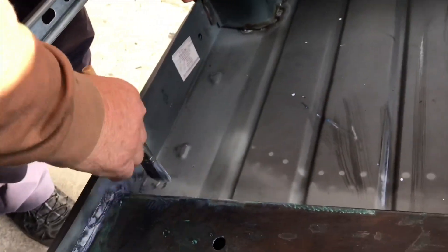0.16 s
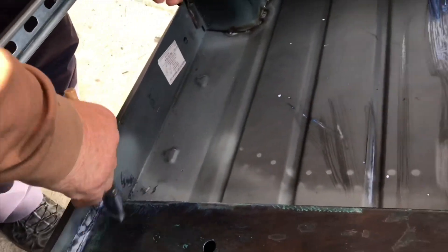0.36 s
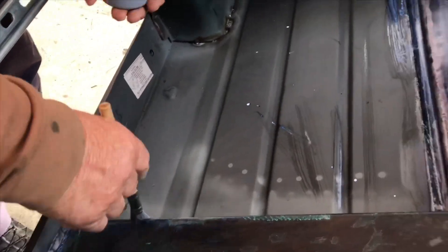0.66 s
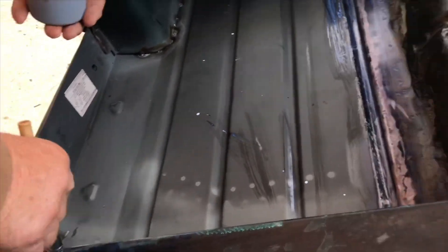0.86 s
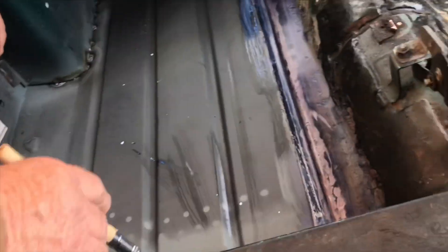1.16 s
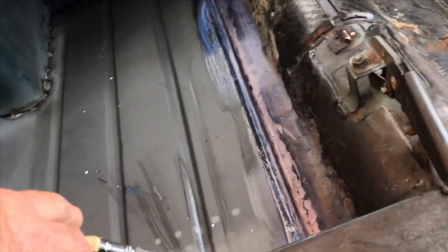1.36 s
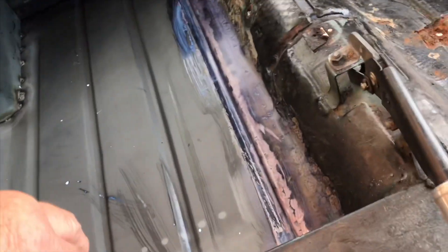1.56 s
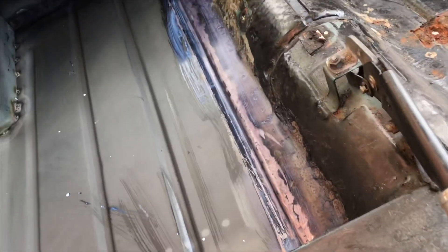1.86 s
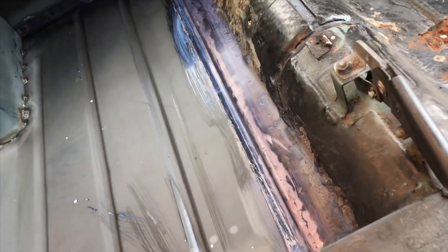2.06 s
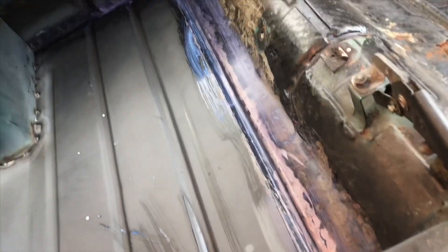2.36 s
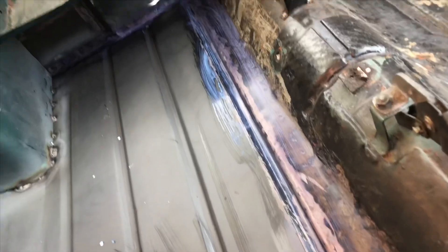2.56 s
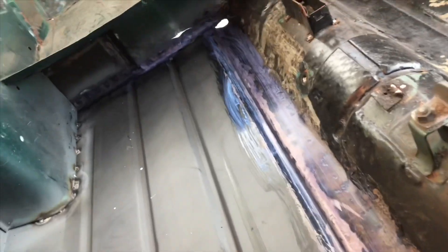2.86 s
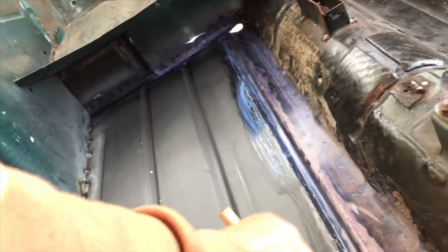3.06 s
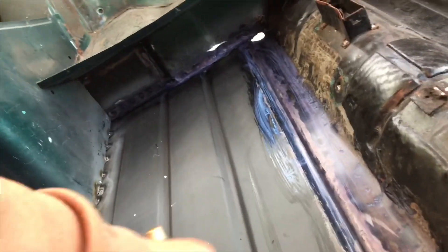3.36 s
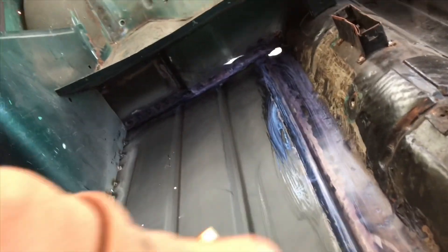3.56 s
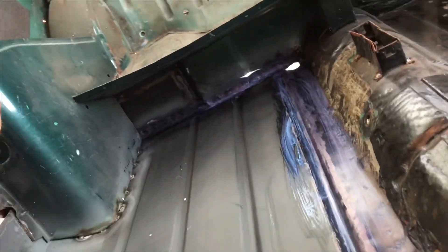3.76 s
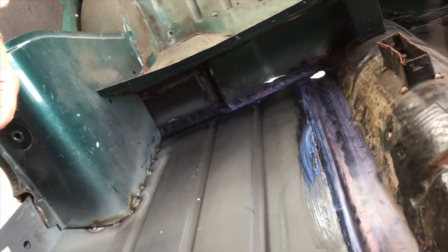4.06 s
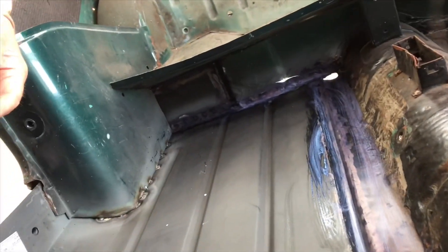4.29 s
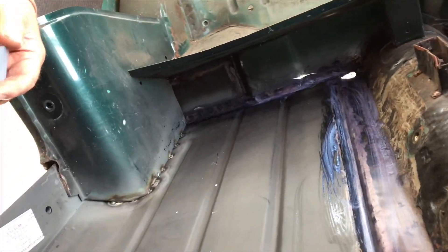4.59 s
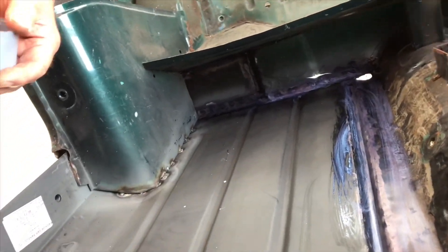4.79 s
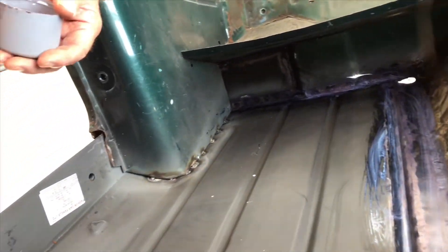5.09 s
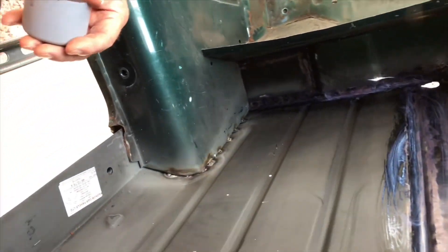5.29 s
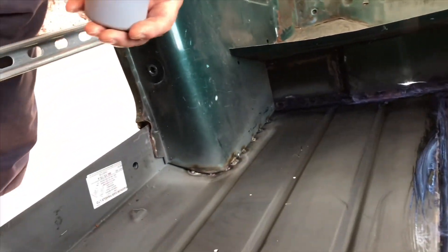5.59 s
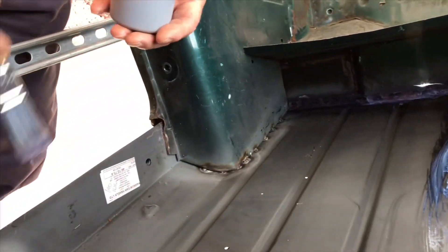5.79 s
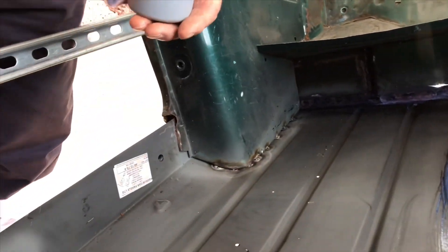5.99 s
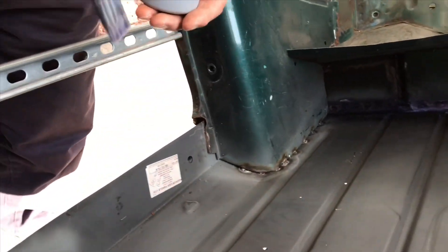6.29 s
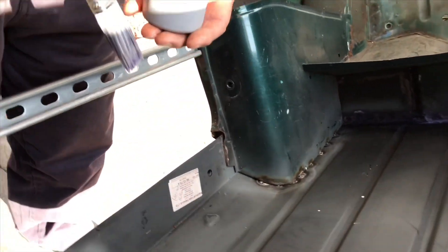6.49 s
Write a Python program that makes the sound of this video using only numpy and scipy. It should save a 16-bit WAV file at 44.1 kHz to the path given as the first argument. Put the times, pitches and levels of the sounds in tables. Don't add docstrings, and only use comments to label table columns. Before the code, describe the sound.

Quick, crisp bristle dabs come first, with a couple of small ticks on metal. Rougher overlapping strokes follow, making thin sheet steel resonate, with brief squeaks and solid knocks. Brisk scrubbing continues, thins out, and ends in a short metallic clank and fade. It is close, dry and mono, with a very short dull tail, faint room noise and hiss, and soft low wind thumps on the microphone.

```python
import sys
import numpy as np
from scipy import signal
from scipy.fft import rfft, irfft, next_fast_len
from scipy.io import wavfile
from scipy.ndimage import uniform_filter1d

SR = 44100
rng = np.random.default_rng(int(sys.argv[2]) if len(sys.argv) > 2 else 0)


def unload_wav(signal):
    wavfile.write(
        sys.argv[1],
        SR,
        np.round(np.clip(np.atleast_2d(signal).T, -1, 1) * 32767).astype(np.int16),
    )


def voltage_ratio(decibels):
    exponent = np.asarray(decibels, float) / 20
    return 10 ** exponent


N = 292806


def evened(x):
    return x / np.sqrt(np.mean(x ** 2) + 1e-20)


def smoothed(x, size, axis=-1):
    return uniform_filter1d(uniform_filter1d(x, size, axis=axis), size, axis=axis)


def curves(rows):
    s, *columns = np.transpose(rows)
    return [np.interp(np.arange(N) / SR, s, column) for column in columns]


def colour(x, spectrum):
    size = next_fast_len(len(x))
    hz, db = np.transpose(spectrum)
    bins_hz = np.fft.rfftfreq(size, 1 / SR)
    gain = voltage_ratio(np.interp(np.log(bins_hz + 0.13), np.log(hz + 0.064), db))
    return evened(irfft(rfft(x, size) * gain, size)[:len(x)])


def dulled(x, hz):
    return signal.sosfilt(signal.butter(N=4, Wn=hz, fs=SR, output="sos"), x)


def resonate(x, hz, width):
    r = np.exp(-np.pi * width / SR)
    return signal.lfilter([1 - r, 0, r - 1], [1, -2 * r * np.cos(2 * np.pi * hz / SR), r * r], x)


def chatter(size, depth_db):
    bumps = evened(smoothed(rng.standard_normal(N), size))
    return evened(voltage_ratio(depth_db * bumps))


# f/Hz, level/dB per Hz
SHOP = [(88, -34), (150, -10), (269, 0), (302, -3.5), (437, -8), (845, -14.5), (1430, -18.5), (1800, -20),
        (4200, -21.5), (6000, -73.5), (15900, -120)]
# f/Hz, level/dB per Hz
SELF_NOISE = [(1200, -31), (3000, 2.5), (4300, -6), (5000, -4), (10000, -12), (15750, -12), (15950, -80)]
# t/s, level/dB
FADE = [
    (0, 0),
    (6.15, -3),
    (6.25, -14.5),
    (6.32, -29.5),
    (6.55, -25.5),
    (6.64, -16),
]


def shop():
    uneven = chatter(size=3000, depth_db=1.5)
    room = voltage_ratio(-64) * colour(rng.standard_normal(N), SHOP) * uneven
    hiss = voltage_ratio(-76) * colour(rng.standard_normal(N), SELF_NOISE)
    fade_db = curves(FADE)[0]
    return voltage_ratio(fade_db) * (room + hiss)


# t/s, slow pressure level/dB, eddies re slow level/dB
BUFFET = [(0.0, -40.5, -3), (0.18, -17, -27), (0.26, -29, -9), (1.13, -22.5, -20.5), (1.35, -32, -6.5),
          (1.55, -19, -21), (2.11, -28.5, -12), (2.16, -18, -23), (4.25, -20.5, -16.5),
          (4.44, -31.5, -11.5), (4.49, -17, -25), (4.94, -28, -11.5), (5.75, -24, -19), (5.9, -39.5, 1),
          (6.1, -20.5, -21), (6.36, -57, -4.5), (6.58, -45, -24), (6.64, -54.5, 2)]
# f/Hz, level/dB per Hz
SWAY = [(1, 7), (4, 10), (9, 12.5), (13, 11), (18, 1.5), (24, -21.5), (40, -68.5), (200, -160)]
# f/Hz, level/dB per Hz
RUMBLE = [(12, -16.5), (22, -1), (30, -2.5), (40, -11.5), (58, -19), (76, -19), (100, -25), (130, -33.5),
          (200, -42.5), (300, -97.5), (900, -150)]


def buffet():
    slow_db, rumble_db = curves(BUFFET)
    sway = colour(rng.standard_normal(N), SWAY)
    rumble = colour(rng.standard_normal(N), RUMBLE)
    power = smoothed(sway ** 2, size=5000)
    even_sway = evened(sway / np.sqrt(power + 0.068))
    return voltage_ratio(slow_db) * (voltage_ratio(-0.7) * even_sway + voltage_ratio(rumble_db + 3) * rumble)


def walls(x):
    t = np.arange(SR // 4) / SR
    tail = rng.standard_normal(len(t)) * voltage_ratio(-60 * t / 0.12) * (t > 0.003)
    tail = tail / np.linalg.norm(tail)
    return dulled(signal.oaconvolve(x, tail)[:N], 4000)


# t/s, peak level/dB, ringing f/Hz, t60/s, crack re ring level/dB
KNOCKS = [(0.019, -47, 897, 0.03, -11), (0.267, -35, 1100, 0.0455, 2.5), (0.522, -49.5, 1100, 0.034, -1),
          (1.48, -61, 607, 0.027, -4.5), (1.534, -59.5, 600, 0.03, -3.5), (3.085, -39, 2570, 0.053, -15.5),
          (3.454, -27, 850, 0.021, -5), (3.618, -37, 1420, 0.037, -4), (3.714, -40, 814, 0.046, -6.5),
          (4.59, -31, 1280, 0.022, -0.5), (5.272, -34, 1280, 0.024, -8.5), (5.637, -49, 1450, 0.044, -22),
          (5.866, -46.5, 1315, 0.025, -6), (5.984, -36, 600, 0.02, -5.5), (6.046, -41.5, 1910, 0.057, -18),
          (6.144, -60, 600, 0.03, -1.5), (6.189, -59, 600, 0.03, -10)]


def knocks():
    out = np.zeros(N + SR)
    t = np.arange(4000) / SR
    for s, db, hz, t60, crack_db in KNOCKS:
        ring = np.sin(2 * np.pi * hz * t) * voltage_ratio(-60 * t / max(t60, 0.005))
        crack = uniform_filter1d(rng.standard_normal(len(t)), size=3)
        crack = crack * voltage_ratio(crack_db - 60 * t / 0.034)
        out[round(s * SR):][:len(t)] += voltage_ratio(db - 8.5) * (ring + crack)
    return out[:N]


# f/Hz, level/dB, t60/s
CLANK = [(874, -6.5, 0.097), (1420, -6.5, 0.18), (1743, -0.5, 0.13), (1910, -1, 0.093), (2143, -2.5, 0.14),
         (2700, -2.5, 0.083), (2846, -8, 0.063), (3200, -7, 0.13), (4210, -31, 0.25)]


def clank():
    start_s, level_db = 6.038, -41.5
    t = np.arange(6000) / SR
    swell = np.minimum(0.5 + t / 0.027, 1)
    decay = voltage_ratio(-60 * np.maximum(t - 0.026, 0) / 0.058)
    scrape = rng.standard_normal(len(t)) * swell * decay
    ring = sum(voltage_ratio(db) * resonate(scrape, hz, 2.7 / t60 + 40) for hz, db, t60 in CLANK)
    ring = dulled(ring, 5500)
    ring = voltage_ratio(level_db) * ring / ring[:1500].std()
    return np.pad(ring, (round(start_s * SR), N))[:N]


# t/s, length/s, f/Hz, width/Hz, level/dB
SINGS = [(0.079, 0.035, 2800, 300, -54), (.82, 0.06, 2240, 150, -59.5), (3.773, 0.044, 2110, 90, -51),
         (3.78, .13, 2005, 60, -54.5), (5.273, 0.041, 1280, 80, -51), (5.274, 0.041, 1460, 90, -49),
         (5.559, 0.35, 1415, 130, -65.5), (3.28, 0.042, 3050, 504, -50), (5.864, 0.046, 1350, 70, -58),
         (5.868, .045, 2700, 120, -65), (5.75, .045, 7100, 500, -76), (6.14, 0.048, 7000, 900, -77),
         (6.182, 0.056, 8470, 1500, -77), (6.53, 0.107, 1170, 61, -93)]
# t/s, length/s, f/Hz, width/Hz, level/dB
DRUMS = [(0.048, 0.1, 302, 77, -59), (.34, 0.088, 313, 60, -58), (.74, 0.063, 750, 200, -63),
         (2.565, .11, 289.5, 30, -49.5), (2.581, .12, 456, 85, -59.5), (2.859, 0.086, 550, 99, -48),
         (2.888, 0.11, 407, 95, -52), (3.485, 0.094, 508, 120, -63.5), (3.68, 0.13, 527, 40, -59),
         (4.05, 0.113, 691.3, 63, -60.5), (4.182, 0.056, 717, 120, -55.5), (4.748, 0.069, 596, 150, -53),
         (4.938, 0.11, 570, 65, -54.5), (5.857, 0.049, 266, 56, -58), (5.967, 0.043, 557, 59, -55),
         (6.041, 0.044, 297, 150, -60.5), (.84, .07, 190, 40, -58.5), (5.266, .03, 695, 150, -56)]


def squeaks():
    out = np.zeros(N)
    for s, length, hz, width, db in SINGS + DRUMS:
        rub = rng.standard_normal(20000)
        tone = resonate(resonate(rub, hz, width), hz, 2.0 * width)
        tone = tone[4000:][:round(length * SR)]
        swell = signal.windows.tukey(len(tone), 0.45)
        out[round(s * SR):][:len(tone)] += voltage_ratio(db) * evened(tone) * swell
    return out


def slips(per_s, spread_db):
    size = voltage_ratio(spread_db * np.minimum(rng.exponential(1, N), 4))
    sign = rng.choice([-1., 1.], N)
    return evened(size * sign * (rng.random(N) < per_s / SR))


def wander(x, depth_db):
    z = signal.stft(x, nperseg=1024, noverlap=768)[2]
    patches = uniform_filter1d(rng.standard_normal(z.shape), size=2, axis=0)
    patches = evened(uniform_filter1d(patches, size=14, axis=1))
    return evened(signal.istft(z * voltage_ratio(depth_db * patches), nperseg=1024, noverlap=768)[1][:N])


# start t/s, rise/s, fall/s, fizz of the tips level/dB, steel re fizz
# level/dB
BRUSH_STROKES = [(0.015, 0.046, 0.07, -53.5, -6.0), (0.085, 0.113, 0.032, -73, -4), (0.266, 0.036, 0.061, -47.5, -5),
                 (0.339, 0.0147, 0.22, -69, -2.5), (0.516, 0.015, 0.0855, -65, 8.5),
                 (0.594, 0.035, 0.047, -50.5, -7.5), (0.636, 0.014, 0.147, -58.5, 1.0),
                 (0.784, 0.061, 0.057, -52, -2), (0.968, 0.068, 0.049, -71.5, -10),
                 (1.038, 0.082, 0.15, -54.5, -2.5), (1.18, 0.16, 0.094, -67.4, -0.0),
                 (1.461, 0.0274, 0.033, -64.7, 5), (1.495, 0.11, 0.11, -61, 3), (1.702, 0.093, 0.151, -60, 4),
           (1.85, 0.1176, 0.183, -58.5, 5.5), (1.96, 0.199, 0.158, -60.5, -8.5),
           (2.322, 0.0213, 0.036, -67.5, 8.5), (2.351, 0.058, 0.18, -59.5, 1),
           (2.525, 0.04, 0.086, -54.5, 4), (2.622, 0.041, 0.55, -72.5, 1), (2.811, 0.12, 0.0678, -51, 1),
           (2.92, 0.12, 0.041, -56.5, -14), (3.0, 0.12, 0.082, -55.2, -4.0),
           (3.189, 0.11, 0.08, -51.5, 0.5), (3.394, 0.055, 0.073, -56, 1),
           (3.44, 0.102, 0.039, -65.5, -1.0), (3.549, 0.11, 0.2, -59, 0), (3.701, 0.0087, 0.039, -52, 3.5),
           (3.71, 0.072, 0.26, -53, -0.5), (3.934, 0.116, 0.39, -68, -5),
                 (4.004, 0.11, 0.026, -57, 8.5), (4.123, 0.15, 0.053, -55.5, 6.5), (4.295, 0.079, 0.073, -60, 6.5),
          (4.419, 0.07, 0.19, -56, 0), (4.537, 0.053, 0.0243, -55.5, -9), (4.65, 0.082, 0.14, -52.5, -3.5),
          (4.879, 0.064, 0.11, -53.5, -1), (5.032, 0.1, 0.097, -54.5, -5), (5.263, 0.029, 0.049, -54, 1.5),
          (5.302, 0.047, 0.08, -58.5, 7.5), (5.406, 0.047, 0.17, -59.5, -0.5), (5.44, 0.11, 0.054, -57, 3),
          (5.734, 0.04, 0.032, -83, 11.0), (5.845, 0.149, 0.036, -67.5, 11.5),
          (6.03, 0.0149, 0.058, -61.5, 16), (6.08, 0.145, 0.0078, -89, 10)]


def pressure_db(edge_db, lag_s, steel):
    start, rise, fall, db, steel_db = np.transpose(BRUSH_STROKES)[:, :, None]
    t = np.arange(0, N, 32) / SR
    late = t - lag_s - start - rise
    down = np.where(late < 0, abs(late / rise) ** 2.23, abs(late / fall) ** 2.26)
    power = (voltage_ratio(db + steel * steel_db - np.minimum(edge_db * down, 150)) ** 2).sum(axis=0)
    return np.interp(np.arange(N) / SR, t, 10 * np.log10(power))


def modes(drag, table):
    out = np.zeros(N)
    for k, (hz, width, db) in enumerate(table):
        out += (-1) ** k * voltage_ratio(db) * resonate(drag, hz, width) / np.sqrt(width)
    return out


# t/s, ribs between strokes level/dB, pan re ribs level/dB
TRAVEL = [(0, -69.5, 1.5), (.55, -69, 0), (.9, -71, -3.5), (1.4, -73, 4.5), (1.7, -61.5, -1),
          (2.05, -55.5, -0.5), (2.4, -64.5, -0.5), (2.62, -67.5, 5), (3.0, -59, 2.5), (3.45, -74, 3),
          (3.7, -61, 2), (4.05, -76, -7), (4.4, -57.5, 2.5), (4.9, -62.5, -2.5), (5.4, -72, 1.5),
          (5.63, -65.5, 0), (5.95, -70.5, 5), (6.3, -88.5, -6)]
# f/Hz, level/dB per Hz
HISS = [(1060, -28.5), (1800, -8), (2210, -5), (2700, -3), (2930, -4), (3780, -0.5), (4490, -13),
        (4800, -14.5), (6240, -61), (10600, -120)]
# f/Hz, level/dB per Hz
FIZZ = [(2650, -28.5), (4500, -10), (5300, -2.5), (6700, -1), (8050, -1), (10000, -6), (12000, -19.5),
        (15600, -46.5), (15900, -100)]
# f/Hz, level/dB per Hz
SHEEN = [(7000, -35), (9500, -19.5), (11000, -1.5), (13000, -1.5), (15000, -1), (15750, -10), (15950, -84)]
# f/Hz, width/Hz, level/dB
RIBS = [(900, 72, -2.5), (1100, 150, -2.5), (1280, 220, 2.5), (1409, 48.4, 0.5), (1517, 71, -2),
        (1690, 130, -2), (1878, 330, -4.5)]
# f/Hz, width/Hz, level/dB
PAN = [(205, 156, -3.5), (290, 16.6, -1.5), (384.3, 260, -0.5), (525.4, 91, 2.5), (600, 44, -2.5),
       (671, 52, -3), (851.4, 82, 2)]


def brush():
    bed_db, pan_db = curves(TRAVEL)
    rest_db = -103 + curves(FADE)[0]
    tips_db = pressure_db(edge_db=28, lag_s=0, steel=0)
    fizz_db = 10 * np.log10(voltage_ratio(tips_db) ** 2 + voltage_ratio(rest_db) ** 2)
    press = voltage_ratio(pressure_db(edge_db=16.5, lag_s=0.0041, steel=0.85))
    ring = np.hypot(press, voltage_ratio(bed_db))
    drum = np.hypot(press * voltage_ratio(pan_db), voltage_ratio(bed_db + 2.5 + 0.22 * pan_db))

    tips = wander(slips(16000, 1.9), 2.7) * chatter(size=150, depth_db=1.04)
    hiss_db = 3 - 0.095 * (fizz_db + 54)
    sheen_db = -15 + 0.11 * (fizz_db + 57.5)
    air = voltage_ratio(hiss_db) * colour(tips, HISS)
    air += voltage_ratio(-0.83) * colour(tips, FIZZ)
    air += voltage_ratio(sheen_db) * colour(tips, SHEEN)

    drag = wander(slips(6000, 2.6), 2.8) * chatter(size=300, depth_db=0.94)
    ribs = evened(dulled(modes(drag, RIBS), 2450))
    pan = evened(dulled(modes(drag, PAN), 1070))
    steel = ring * voltage_ratio(0.03) * ribs + drum * voltage_ratio(-2.5) * pan
    on_floor = np.arange(N) < TRAVEL[-1][0] * SR
    return (voltage_ratio(fizz_db) * air + steel) * on_floor


def scene():
    near = brush() + knocks() + clank() + squeaks()
    return (near + voltage_ratio(-11.5) * walls(near) + buffet() + shop())[None]


def low_pass(x):
    return signal.sosfilt(signal.butter(12, 15730, fs=SR, output="sos"), x)


def record(dry):
    return low_pass(dry)


dry = scene()
out = record(dry)
unload_wav(out)
```